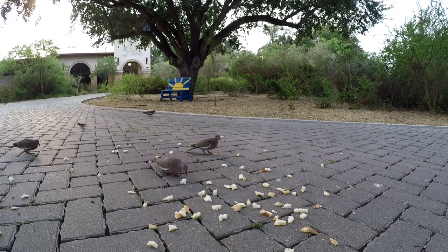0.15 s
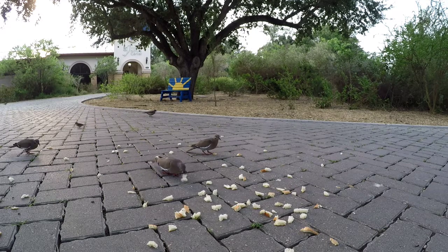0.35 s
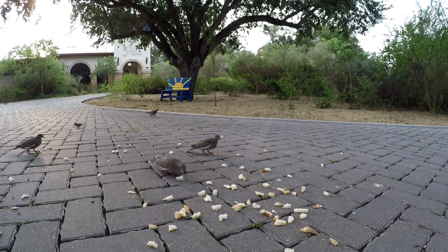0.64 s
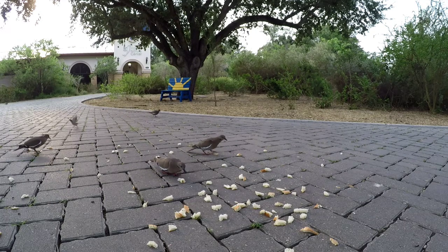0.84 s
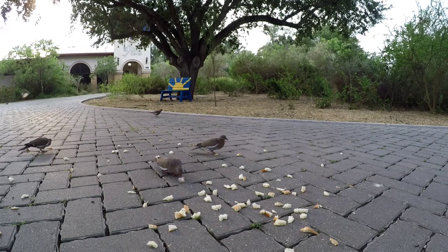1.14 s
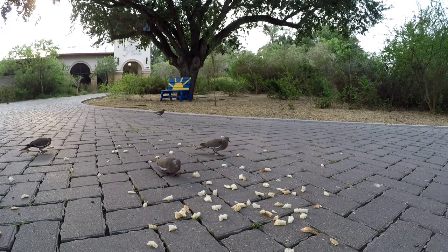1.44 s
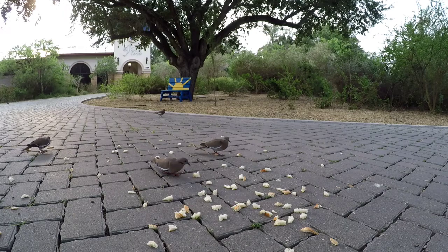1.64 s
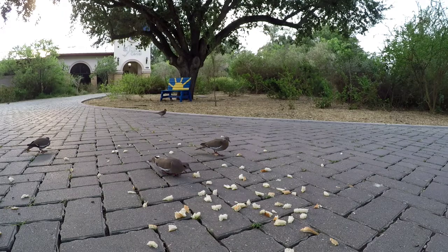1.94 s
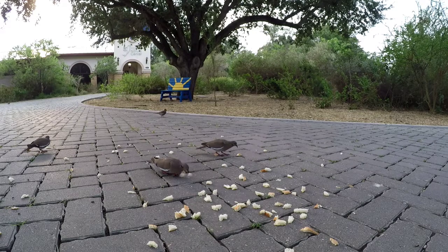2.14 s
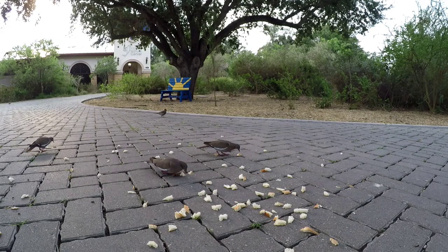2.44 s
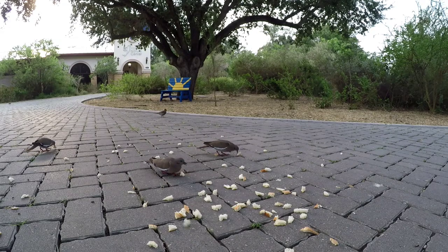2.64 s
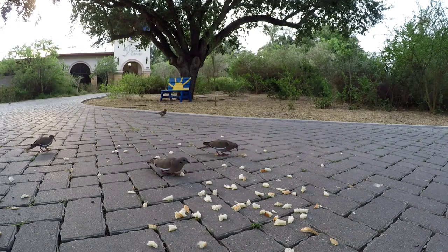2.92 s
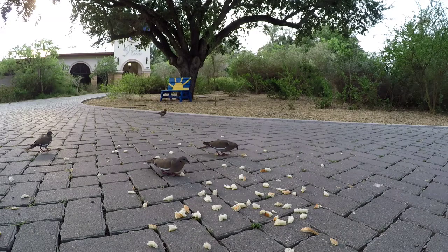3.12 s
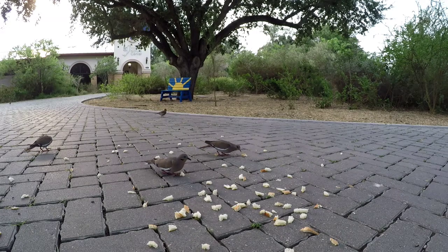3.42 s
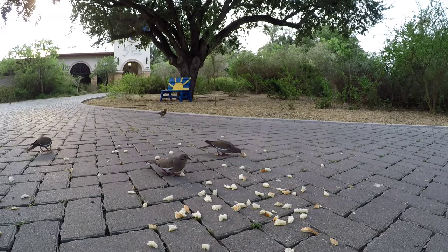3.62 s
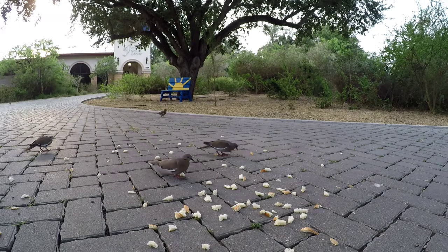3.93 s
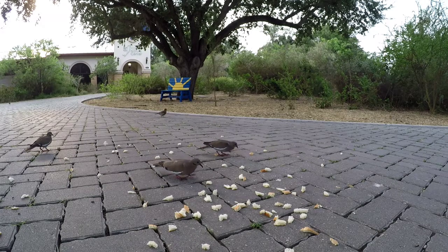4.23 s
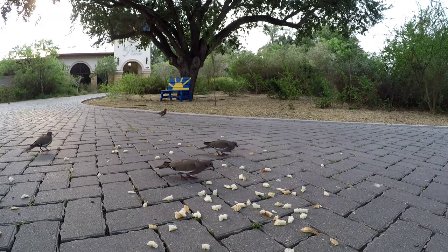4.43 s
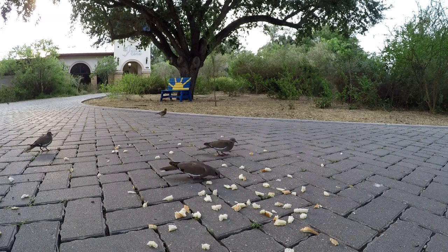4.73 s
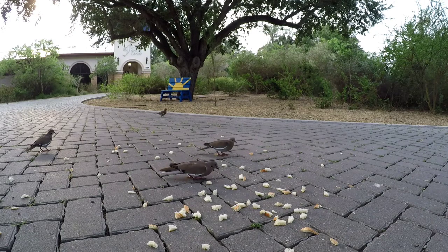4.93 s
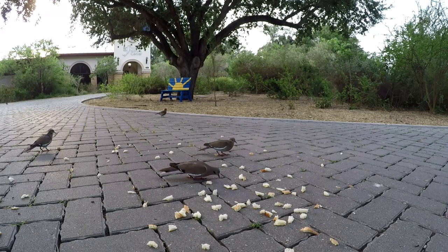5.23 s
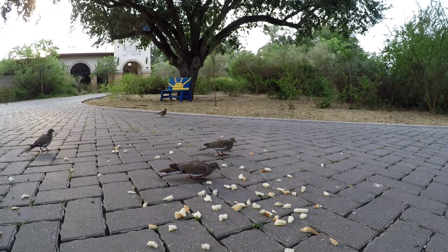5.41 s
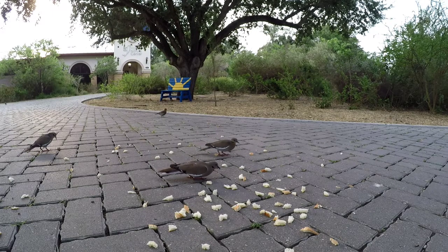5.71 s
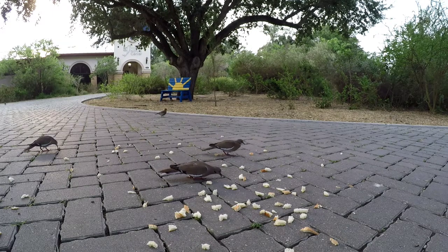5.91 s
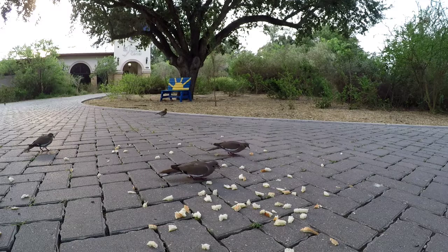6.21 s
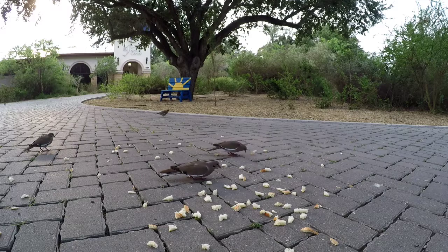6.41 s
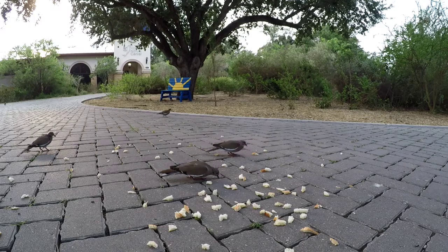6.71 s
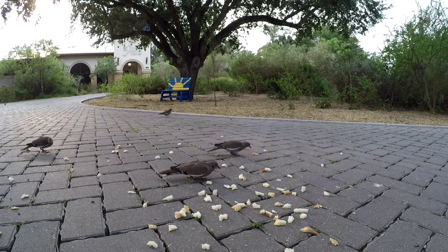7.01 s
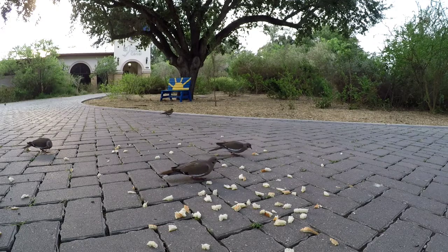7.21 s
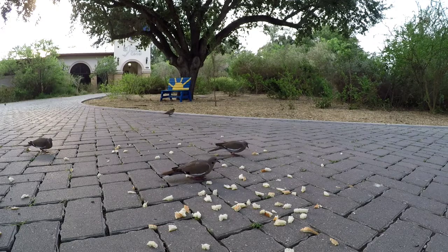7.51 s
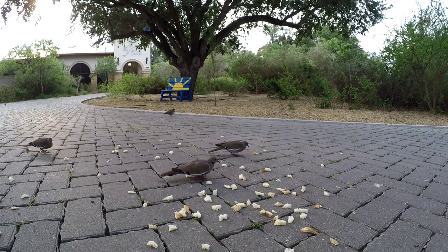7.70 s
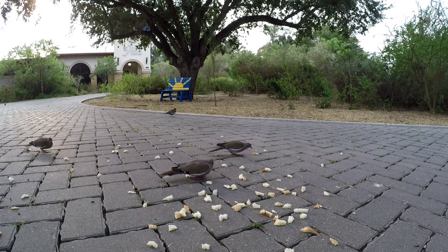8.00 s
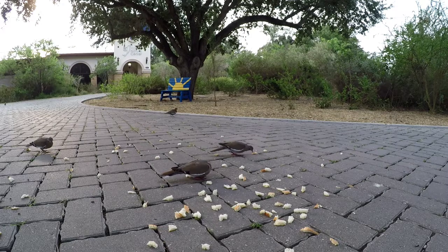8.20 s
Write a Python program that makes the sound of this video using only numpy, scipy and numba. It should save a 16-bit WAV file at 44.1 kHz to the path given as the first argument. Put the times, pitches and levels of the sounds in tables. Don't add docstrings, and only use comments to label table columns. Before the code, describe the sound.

A quiet park with a soft bed of leaves, distant traffic, low wavering machinery hum and faint high insects. From 0.1 s a large bird rasps harshly, short, short, long; the bout returns near 1.05 and 2.0 s. A faint motor whine sinks away by 1.2 s, and a pure arched whistle sounds at 0.8 s. From 2.7 to 5.7 s the rasping continues much fainter behind trees. Small buzzy chips start at 1.7 s and run about ten per second from 2.5 to 5 s, with short whistles, another clear arch at 3.9 s, thin scratchy notes and tiny beak taps at 3.0, 3.7 and 5.3 s. Hoarse warm-up notes begin around 5.2 s, strengthening by 5.9. From 6.4 s a closer pair duets loudly, high squawks and pulsing cries over low gruff notes, repeating near 7.3 and 8.2 s until cut off at 8.35. Hum and cicadas swell beneath.

```python
import sys
import numpy as np
from scipy import signal
from scipy.fft import rfft, irfft
from scipy.io import wavfile
from scipy.ndimage import uniform_filter1d
from numba import njit

SR = 44100
rng = np.random.default_rng(int(sys.argv[2]) if len(sys.argv) > 2 else 0)


def voltage_ratio(decibels):
    exponent = np.asarray(decibels, float) / 20
    return 10 ** exponent


def inscribe(sig):
    pcm = np.round(np.clip(np.atleast_2d(sig).T, -1, 1) * 32767)
    wavfile.write(sys.argv[1], SR, pcm.astype(np.int16))


N = 368235

# start [s], level change [dB], stretch of the notes [ratio].
HEN_PHRASES = [(6.492, -0.98, 0.94), (7.394, 0.063, .87), (8.292, -0.81, 1.17)]
# pitch tremble [share], flutter [dB], depth of a regular throb [dB],
# rasp that splits a line into strands [share].
HOARSE, HUSKY, CLEAR = (.025, 3.5, 2, .5), (.015, 2.2, 7, .35), (.007, 3.5, 2, .15)
LOCKING_DB = -5


def rms_one(x):
    return x / np.sqrt(np.mean(x ** 2) + 1e-20)


def in_time(rows, fade=0.0068):
    s, *columns = np.transpose(rows)
    span = slice(max(round(s[0] * SR), 0), min(round(s[-1] * SR), N))
    t = np.arange(N)[span] / SR
    to_end = s[-1] - t + (span.stop == N)
    edge = np.clip(np.minimum(t - s[0], to_end) / fade, 0, 1)
    return span, edge, [np.interp(t, s, c) for c in columns]


def effort(peak_s, hold_s, release_s, attack, fall_db_per_s):
    attack_s, climb_db = attack
    held = peak_s + max(hold_s, 0)
    return in_time([(peak_s - attack_s, -climb_db, 0),
                    (peak_s, 0, 0),
                    (held, 0, 0),
                    (held + release_s, 0, -fall_db_per_s * release_s)])


def drift(n, rate):
    r = np.exp(-2 * np.pi * rate / SR)
    run_in = int(2 * SR / rate)
    slow = signal.lfilter([1], [1, -2 * r, r * r], rng.standard_normal(n + run_in))[run_in:]
    return rms_one(slow)


def tone_phase(hz):
    return 2 * np.pi * np.cumsum(hz) / SR


def coloured(x, spectrum):
    hz, db = np.transpose(spectrum)
    at = np.log(np.fft.rfftfreq(len(x), 1 / SR) + 1)
    return rms_one(irfft(rfft(x) * voltage_ratio(np.interp(at, np.log(hz), db)), len(x)))


def peak(x, hz, width):
    r = np.exp(-np.pi * width / SR)
    return signal.lfilter([(1 - r * r) / 2, 0, (r * r - 1) / 2],
                          [1, -2 * r * np.cos(2 * np.pi * hz / SR), r * r], x)


def twice(x, hz, width):
    return rms_one(peak(peak(x, hz, width), hz, width))


@njit
def resonate(x, hz, width, sr):
    r = np.exp(-np.pi * width / sr)
    y = np.zeros(len(x))
    for i in range(2, len(x)):
        fresh = (1 - r * r) / 2 * (x[i] - x[i - 2])
        y[i] = fresh + 2 * r * np.cos(2 * np.pi * hz[i] / sr) * y[i - 1] - r * r * y[i - 2]
    return y


def moving_twice(x, hz, width):
    return rms_one(resonate(resonate(x, hz, width, SR), hz, width, SR))


def rattle(n, per_s):
    depth_db = 7
    cycle = np.cumsum(per_s * voltage_ratio(5.6 * drift(n, 25))) / SR % 1
    return rng.standard_normal(n) * voltage_ratio(-depth_db * cycle + 1.0 * drift(n, 15.15))


def windpipe(air):
    # resonance [Hz], width [Hz], level [dB].
    tube = [(655, 178, -9), (890, 1060, -17.5), (2300, 400, -19), (2415, 270, -9.5), (2797, 110, -5),
            (3230, 260, -15), (4070, 340, -11.5), (4630, 430, -10.5), (5844, 1020, -6), (6134, 1590, -10.5),
            (8890, 1840, -25.5)]
    return rms_one(sum((-1) ** k * voltage_ratio(db) * peak(air, hz, width) for k, (hz, width, db) in enumerate(tube)))


def locking(air):
    climb_per_s = .3
    bands = np.geomspace(2700, 5900, 12) * rng.uniform(.96, 1.04, 12)
    u = np.linspace(-1, 1, len(air))
    bend = 1 + climb_per_s * len(air) / SR / 2 * (.5 * u - u ** 2)
    return rms_one(sum(voltage_ratio(6 * drift(len(air), 9)) * moving_twice(air, hz * bend, 150.0) for hz in bands))


def cock():
    # peak [s], hold [s], release [s], level [dB].
    rasps = [
        (.124, 0.00088, .12, -42.5),
        (.31, 0.018, 0.1, -42),
        (.451, 0.22, 0.15, -43.5),
        (1.05, 0.042, 0.12, -44.5),
        (1.25, 0.0015, 0.087, -40.5),
        (1.368, 0.15, 0.25, -43.5),
        (1.99, 0.06, 0.11, -44.5),
        (2.179, 0.03, 0.085, -42),
        (2.305, 0.18, 0.17, -43.5),
    ]
    # throat at the peak [Hz], its climb [Hz/s], throat level [dB],
    # open beak level [dB], fall [dB/s].
    shapes = [
        (1140, 1300, -1.5, 3.5, 77),
        (1187, 980, 2, -2, 99),
        (1170, 120, 3, -2, 133),
    ]
    # length [s], climb [dB].
    attacks = [(.11, 31), (.055, 10), (.04, 7.5)]
    # centre [Hz], width [Hz], level [dB].
    side_bands = [(1328, 130, -5), (1942, 104, -8), (2850, 84, -13)]
    throat_lead, beak_swing = 0.73, 1.44
    out = np.zeros(N)
    for k, (s, hold, release, db) in enumerate(rasps):
        hz, climb, throat_db, open_db, fall = shapes[k % 3]
        span, edge, (rising, falling) = effort(s, hold, release, attacks[k % 3], fall)
        n = len(edge)
        t = np.arange(n) / SR
        level_db = db + rising + falling
        first_db = db + throat_db + throat_lead * rising + falling
        beak_db = db + open_db + beak_swing * (rising + falling)
        air = rattle(n, 75)
        voice = voltage_ratio(level_db + 6.5) * (windpipe(air) + voltage_ratio(LOCKING_DB - 2.5) * locking(air))

        first_hz = hz + climb * (np.arange(N)[span] / SR - s)
        first_hz = first_hz * (1 - .1 * np.exp(-t / .02))
        first = moving_twice(air, first_hz, 300.0)
        held = np.sin(tone_phase(first_hz * (1 + .02 * drift(n, 90))))
        held_db = 5 * (2 * np.exp(-t / .17) - .6) + 2.5 * drift(n, 25)
        voice = voice + voltage_ratio(first_db + 4.0) * rms_one(first + voltage_ratio(held_db) * held)

        upper_hz = 2864 * (1 - 0.1 * np.clip(-falling / 6, 0, 1) + 0.016 * drift(n, 7.24))
        voice = voice + voltage_ratio(level_db - 7) * moving_twice(air, upper_hz, 170.0)
        for band_hz, width, band_db in side_bands:
            wavering_db = level_db + 1.5 + band_db + 2.9 * drift(n, 12.1)
            voice = voice + voltage_ratio(wavering_db) * twice(air, band_hz, width)
        out[span] += edge * (voice + voltage_ratio(beak_db + 2.0) * twice(air, 1835, 390))
    return out


def far_cock():
    # peak [s], hold [s], release [s], level [dB].
    rasps = [(2.731, 0.0, 0.048, -52.5), (2.83, 0.1, 0.12, -58), (3.3, 0.047, 0.078, -51.5),
             (3.5, 0, 0.075, -49.5), (3.65, 0.11, 0.45, -48.5), (4.28, 0.017, 0.05, -50),
             (4.45, 0.0084, .1, -49.5), (4.6, 0.1, .2, -50), (5.0, 0.018, 0.11, -59),
             (5.231, 0.0, 0.13, -56), (5.63, 0.06, .08, -57)]
    out = np.zeros(N)
    for s, hold, release, db in rasps:
        span, edge, (rising, falling) = effort(s, hold, release, (.09, 13.7), 68)
        air = rattle(len(edge), 75)
        voice = twice(air, 1276, 154) + voltage_ratio(-3.5) * twice(air, 1720, 580) + voltage_ratio(-3.5) * windpipe(air)
        out[span] += edge * voltage_ratio(db + rising + falling + 5.5) * voice
    return out


def breath(syllables, colour, attack, fall_db_per_s):
    chest_even_db, chest_lag = -34, 0.81
    out = np.zeros(N)
    for s, hold, release, db in syllables:
        span, edge, (rising, falling) = effort(s, hold, release, attack, fall_db_per_s)
        level_db = db + rising + falling
        chest_db = chest_lag * (chest_even_db - level_db)
        air = rattle(len(edge), 100)
        chest = twice(air, 1336, 700) + voltage_ratio(-7.5) * twice(air, 810, 930) + voltage_ratio(-13.5) * twice(air, 673, 200)
        voice = coloured(air, colour) + voltage_ratio(LOCKING_DB) * locking(air) + voltage_ratio(chest_db - 6.0) * chest
        out[span] += edge * voltage_ratio(level_db - 4.5) * voice
    return out


def sing(notes, partials_db, roughness, bow, flatness, throb_per_s=27):
    flank_dull_db = 1.5
    out = np.zeros(N + SR)
    tremble, flutter_db, throb_db, rasp = roughness
    for start, length, top_hz, glide_hz, level_db in notes:
        u = np.linspace(-1, 1, round(length * SR))
        hz = top_hz + u * glide_hz / 2 - (bow[0] + bow[1] * length ** 2) * np.abs(u) ** flatness
        phase = tone_phase(hz * (1 + tremble * drift(len(u), 83.4)))
        throb = np.abs(np.sin(np.pi * throb_per_s * (u + 1) * length / 2))
        swell = voltage_ratio(level_db + throb_db * throb) * np.sqrt(2 * (1 - u ** 4)) * voltage_ratio(-1.5 * u ** 2)
        for k, db in enumerate(partials_db):
            flutter = voltage_ratio(db - flank_dull_db * k * u ** 2 + flutter_db * drift(len(u), 30.9))
            flutter = flutter * (1 + rasp * drift(len(u), 220)) / np.hypot(1, rasp)
            out[round(start * SR):][:len(u)] += swell * flutter * np.sin((k + 1) * phase)
    return out[:N]


def phrases(notes, starts):
    return [(s + at, length * stretch, hz, glide, db + more)
            for s, more, stretch in starts
            for at, length, hz, glide, db in notes]


def hen():
    # start [s, or s into the phrase], length [s], top [Hz], last minus first [Hz], level [dB].
    left = [(0.0, 0.0673, 1469, 106, -40), (.232, 0.06, 1590, 10, -40.5), (.374, .052, 1590, 56, -35)]
    right = [(.192, 0.065, 1858, 22.5, -42.5), (.262, 0.0673, 2050, -43, -41),
             (.506, .15, 1895, -95.5, -38)]
    warm_up = [(5.22, 0.08, 1706, 90, -60), (5.345, 0.021, 1780, -21.5, -58),
               (5.575, 0.16, 1570, -200, -52.5), (5.87, 0.075, 2000, 400, -45),
               (5.94, 0.049, 1785, 290, -44.5), (6.06, 0.035, 1607, -1, -37), (6.02, 0.15, 1650, -7, -54)]
    cries = [
        (6.98, .22, 821, -30, -43),
        (7.885, .2, 807.5, -40, -43.5),
    ]
    left_partials = [1.25, -15, -9]
    right_partials = [0.11, -4, -8]
    cry_partials = [-30, 1.5, -17, -14.5, -28, -12, -16]
    # peak [s], hold [s], release [s], level [dB].
    puffs = [(5.704, 0.0018, 0.069, -39.5), (5.9, 0.05, 0.1, -33), (6.068, 0.0, 0.059, -29.5),
             (6.2, 0.056, 0.13, -32.5), (7.01, 0.13, 0.17, -29), (7.93, 0.099, 0.17, -31)]
    # frequency [Hz], density [dB per Hz].
    colour = [(1290, -59), (2200, -14), (2250, -25), (2480, -1), (2960, -20), (3250, -4.5), (3840, -8.5),
              (4000, -18), (4370, -6), (4730, -5.5), (5730, -6), (6990, -13), (7760, -21.5), (9320, -22),
              (14800, -50)]
    left_bow = (8, 6500)
    x = sing(warm_up, [1.25, -14, -20], (.022, 3, 7, .6), left_bow, flatness=2.3)
    x += sing(phrases(left, HEN_PHRASES), left_partials, HUSKY, left_bow, flatness=2.3)
    x += sing(phrases(right, HEN_PHRASES), right_partials, HUSKY, (110, 0), flatness=1.8)
    x += sing(cries, cry_partials, (.016, 1, 18, .25), (150, 0), flatness=2.2, throb_per_s=16.5)
    return x + breath(puffs, colour, (0.069, 12.6), 139)


def low_partner():
    # start [s, or s into the phrase], length [s], top [Hz], last minus first [Hz], level [dB].
    low = [(0.0, 0.14, 673.6, 132.5, -46.5), (.21, 0.085, 669, 23.7, -45.5), (.33, .19, 677, 40, -44)]
    lead_in = [(6.148, 0.165, 1050, -42.5, -45)]
    # start [s], level change [dB], stretch of the notes [ratio].
    rounds = [
        (6.425, -1, 1),
        (7.315, -2.5, 1.0),
        (8.23, -1, 1),
    ]
    low_partials = [-1, 4, 1, 2, 1.5, -17, -0.5, -23, -28]
    lead_in_partials = [0, -3, 3, -12, 3, -12]
    # peak [s], hold [s], release [s], level [dB].
    puffs = [(6.51, 0.044, 0.1, -32.5), (6.736, 0.02, 0.048, -28), (6.895, 0, 0.079, -26),
             (7.42, 0.0017, 0.055, -29.5), (7.565, .17, 0.025, -31), (7.789, 0.018, 0.11, -27.5),
             (8.32, .1, 0.035, -31)]
    # frequency [Hz], density [dB per Hz].
    colour = [(1240, -21.5), (2100, -12), (2240, -11), (2430, 0), (2710, -10), (2940, -19.5), (3430, -15),
              (4210, -10), (4640, -4.5), (4990, -11.5), (6120, -10.5), (7510, -25), (8920, -26),
              (11800, -43.5), (14800, -48)]
    x = sing(phrases(low, rounds), low_partials, HOARSE, (8, 0), flatness=1.3)
    x += sing(lead_in, lead_in_partials, (.006, 2.5, 0, .15), (240, 0), flatness=6)
    return x + breath(puffs, colour, (.12, 14.7), 167)


def chips():
    # start of the buzz [s], its peak [dB], level of the peep before it [dB].
    calls = [(1.7, -33, -59.5), (1.789, -34.5, -53), (1.8752, -31.5, -53), (2.5473, -23, -45),
             (2.6521, -22.5, -38), (2.7481, -21, -40), (2.848, -20.5, -41), (2.96, -16.5, -41),
             (3.0758, -21.5, -41), (3.1814, -22.5, -40), (3.348, -24.5, -46), (3.454, -21.5, -39),
             (3.552, -24, -44), (3.6535, -25, -40), (3.705, -25, -45), (3.8242, -26.5, -49),
             (3.928, -26.5, -43), (4.056, -24, -46), (4.228, -27, -51), (4.3224, -26, -42.5),
             (4.423, -24.5, -48), (4.524, -23, -47), (4.711, -27.5, -54), (4.8278, -29.5, -48),
             (4.99, -35.5, -57), (5.25, -47, -65), (5.3403, -51, -71)]
    # frequency [Hz], density [dB per Hz].
    colour = [(1200, -16), (1900, -3.5), (2600, -5), (3300, -3), (4500, -9), (6500, -15.5), (8000, -24),
              (13000, -52)]
    out = np.zeros(N)
    t = np.arange(2048) / SR
    for s, peak_db, peep_db in calls:
        hz = 2598 * (1 + 0.016 * rng.standard_normal())
        i, lead_s = round(s * SR), .027
        arch = np.sin(np.pi * np.clip(t / 0.0286, 0, 1))
        broken = 1 - .8 * np.exp(-((t - .015) / .003) ** 2)
        flutter = voltage_ratio(3 * drift(len(t), 120))
        peep_hz = hz * (.88 + .17 * arch) * (1 + .015 * drift(len(t), 150))
        peep = arch * broken * flutter * np.sin(tone_phase(peep_hz))
        out[i - round(lead_s * SR):][:len(t)] += voltage_ratio(peep_db + 3.5) * peep
        fall = np.sin(tone_phase(hz * (1.16 - 14 * t) * (1 + .06 * drift(len(t), 400))))
        note = voltage_ratio(-12.0 + 1.5 * rng.standard_normal()) * fall * np.exp(-((t - .013) / 0.0051) ** 2)
        puff = (t / 0.016) ** 2 * np.exp(-2 * t / 0.015)
        buzz = coloured(rng.standard_normal(len(t)), colour) * puff
        out[i - 330:][:len(t)] += voltage_ratio(peak_db + 1.0) * (buzz + note)
    return out


def long_whistles():
    # time [s], pitch [Hz], level [dB], third multiple [dB].
    whistles = [
        [(.815, 1020, -58, -12), (.83, 1353, -42, -14), (.85, 1500, -45, -4), (.862, 1530, -55.5, 0),
         (.88, 1597, -39.5, -11), (.935, 1576, -42.5, -5), (.952, 1566, -53, -8), (.962, 1400, -44, -13),
         (.98, 1170, -51, -15)],
        [(3.893, 1220, -45, -12), (3.908, 1398, -38, -17), (3.93, 1490, -47, -8), (3.96, 1557, -50.5, 5),
         (4.0, 1540, -51.5, 1), (4.024, 1430, -41.5, -10), (4.052, 1210, -45, -12)],
    ]
    out = np.zeros(N)
    for rows in whistles:
        span, edge, (hz, db, third_db) = in_time(rows)
        hz = uniform_filter1d(hz, size=400)
        phase = tone_phase(hz * (1 + .004 * drift(len(hz), 80)))
        parts = ((1, third_db / 2 - 5), (2, 0), (3, third_db), (4, third_db - 16), (6, third_db - 16))
        for multiple, part_db in parts:
            level = voltage_ratio(db + 3 + part_db + 1.5 * drift(len(hz), 30))
            out[span] += edge * level * np.sin(multiple * phase)
    return out


def flycatcher():
    # start [s], length [s], top [Hz], last minus first [Hz], level [dB].
    arches = [(1.835, .035, 1610, 150, -60), (2.1, .035, 1745, 0, -47), (2.575, .048, 1650, 10, -45),
              (2.975, .052, 1640, 0, -43), (3.115, .045, 1655, 20, -57), (3.415, .065, 1610, 80, -44),
              (3.56, .04, 1645, -10, -59), (4.07, .13, 1490, -470, -66)]
    partials = [-5.5, 0, -4, -19, -30, -18]
    x = sing(arches, partials, CLEAR, (55, 11500), flatness=2.6)
    hz, width, db = 2500, 140, 3.3
    return x + voltage_ratio(db) * peak(peak(x, hz, width), hz, width)


def peeps():
    # start [s], length [s], top [Hz], last minus first [Hz], level [dB].
    notes = [(.02, .07, 1500, 400, -52), (1.93, .08, 1720, 320, -48), (1.945, .045, 4850, 500, -52),
             (3.745, .045, 2680, -300, -38), (4.21, .03, 1750, -200, -52), (4.3, .06, 4700, 0, -58),
             (4.545, .055, 4900, 0, -54), (5.525, .04, 4920, 0, -52)]
    return sing(notes, [0], CLEAR, (110, 0), flatness=2)


def seets():
    # start [s], peak [dB], centre [Hz].
    thin_notes = [(2.962, -40, 8400), (3.69, -42.5, 8500), (4.371, -49, 8240), (4.9661, -53, 8300),
                  (5.339, -51, 7730)]
    out = np.zeros(N)
    t = np.arange(6000) / SR
    for s, peak_db, hz in thin_notes:
        note = twice(rng.standard_normal(len(t)), hz, 1200) * (1 - np.exp(-t / .004)) * np.exp(-t / 0.045)
        out[round(s * SR):][:len(t)] += voltage_ratio(peak_db - 5.5) * note
    return out


def ticks():
    # start [s], peak [dB].
    taps = [(2.965, -30), (3.702, -33), (5.341, -35.5)]
    out = np.zeros(N)
    t = np.arange(600) / SR
    for s, peak_db in taps:
        strike = (1 - np.exp(-t / .0004)) * np.exp(-t / .002)
        out[round(s * SR):][:len(t)] += voltage_ratio(peak_db) * strike * twice(rng.standard_normal(len(t)), 2000, 2200)
    return out


def trees(x):
    t60_s = .28
    t = np.arange(SR // 2) / SR
    scatter = rng.standard_normal(len(t)) * voltage_ratio(-60 * t / t60_s) * (t > .012)
    scatter = signal.lfilter([.5], [1, -.45], scatter)
    return signal.fftconvolve(x, scatter / np.sqrt(np.sum(scatter ** 2)))[:N]


def machinery():
    # time [s], level [dB].
    load = [(0.0, -59), (2.88, -50.5), (4.2, -60), (6.12, -41.5), (6.42, -49), (6.88, -40), (7.63, -49),
            (8.35, -42.5)]
    # time [s], lift of the upper hum [dB].
    surge = [
        (2.5, 0.0),
        (2.88, 9.5),
        (3.86, 12),
        (4.1, 2),
    ]
    # time [s], pitch [Hz], level [dB].
    whine = [(0.0, 701, -58), (0.96, 722, -49), (1.1, 680, -52), (1.2, 663, -66)]
    span, edge, (load_db,) = in_time(load, fade=1e-4)
    surge_db = np.interp(np.arange(N)[span] / SR, *np.transpose(surge))
    upper_db = -56 + 0.99 * (load_db - load_db.mean()) + surge_db
    out = np.zeros(N)
    for hz, db in ((167.4, load_db), (183.2, upper_db)):
        out[span] += voltage_ratio(db - 2.0) * twice(rng.standard_normal(len(db)), hz, 12.4)
    span, edge, (hz, db) = in_time(whine)
    out[span] += edge * voltage_ratio(db + 2.0 + 2 * drift(len(hz), 11.0)) * np.sin(tone_phase(hz))
    return out


def park_air():
    # time [s], level [dB].
    breeze = [(0, 0.5), (3.4, 0), (4.0, 0.5), (5.1, 0), (5.4, 0), (5.6, 0.5), (5.9, 0.2), (8.35, -0.1)]
    chorus = [
        (0, -68),
        (5.6, -79),
        (6.1, -61),
        (7.2, -57.5),
        (8.35, -60),
    ]
    # frequency [Hz], density [dB per Hz].
    leaf_colour = [(76, -64), (130, -5), (175, -0.5), (412, -14), (473, -14), (875, -19.5), (1360, -19),
                   (1470, -17.5), (2230, -19.5), (3120, -28), (4210, -24.5), (5550, -33.5), (6380, -29.5),
                   (10500, -37), (15000, -52.5)]
    cicada_colour = [(6500, -30), (7800, -3), (8700, 1), (9700, 1), (10800, -9), (11400, -28), (15000, -22)]
    t = np.arange(N) / SR
    leaves_db = -45 + np.interp(t, *np.transpose(breeze)) + 0.64 * drift(N, 1.55)
    leaves = voltage_ratio(leaves_db) * coloured(rng.standard_normal(N), leaf_colour)
    cicadas = voltage_ratio(np.interp(t, *np.transpose(chorus))) * coloured(rng.standard_normal(N), cicada_colour)
    insect = voltage_ratio(-77) * twice(rng.standard_normal(N), 10900, 150)
    return leaves + cicadas + insect


def scene():
    chachalacas = cock() + far_cock() + hen() + low_partner()
    songbirds = long_whistles() + flycatcher() + peeps() + chips() + seets()
    birds = chachalacas + songbirds + ticks()
    echo = voltage_ratio(-13) * trees(birds)
    return (birds + echo + machinery() + park_air())[None]


def low_pass(x):
    return signal.sosfilt(signal.butter(12, 15180, fs=SR, output="sos"), x)


def record(dry):
    cut = signal.sosfilt(signal.butter(10, 134, "high", fs=SR, output="sos"), dry)
    rumble = voltage_ratio(-74) * rms_one(peak(rng.standard_normal(N), 45, 190))
    return low_pass(cut + rumble)


dry = scene()
out = record(dry)
inscribe(out)
```